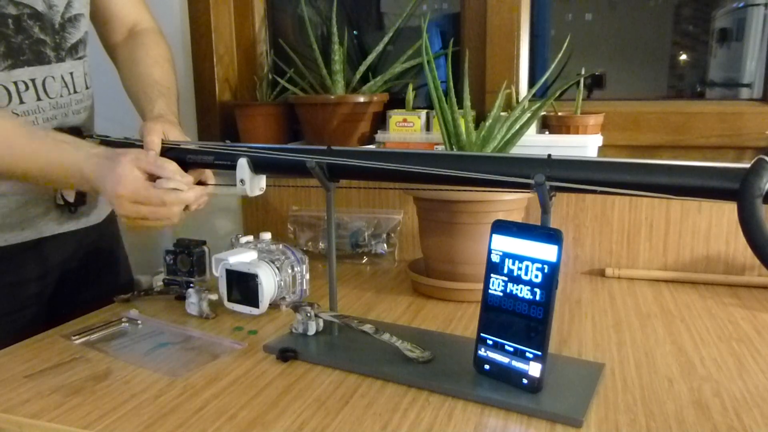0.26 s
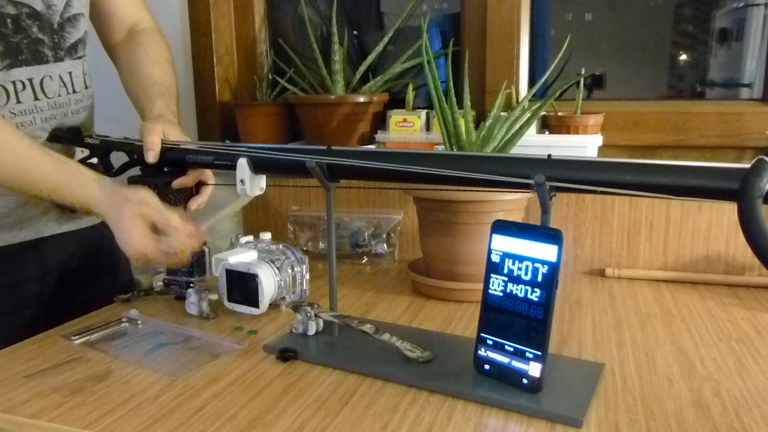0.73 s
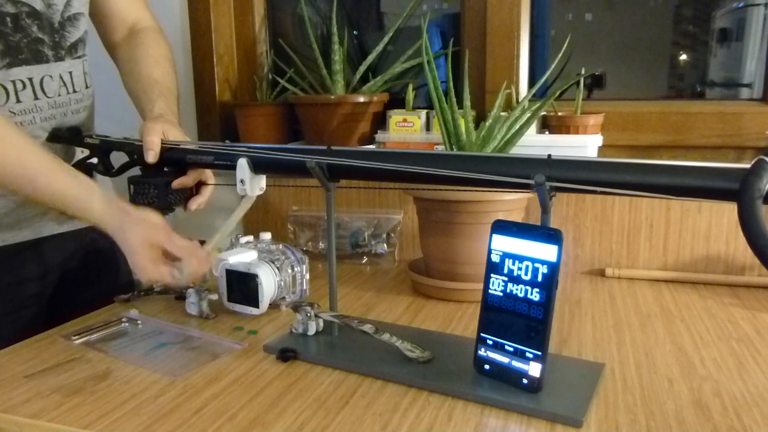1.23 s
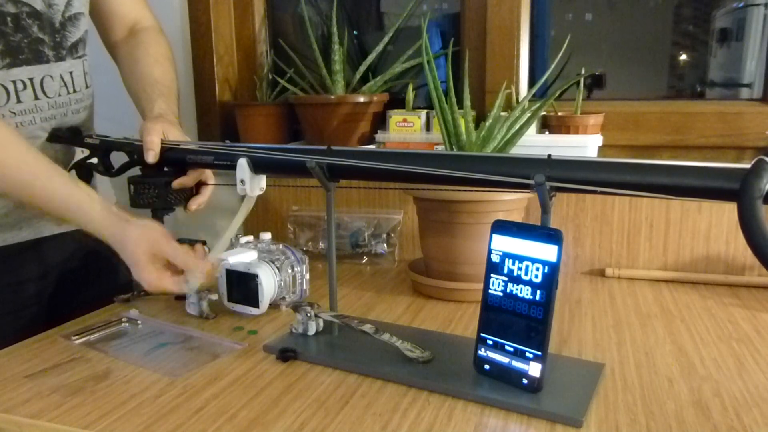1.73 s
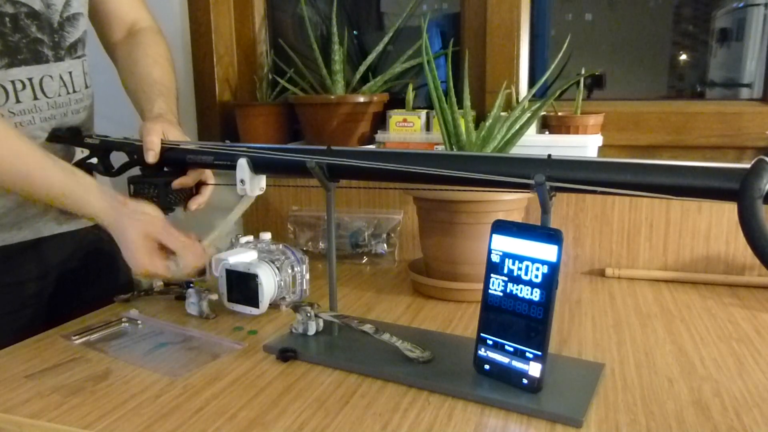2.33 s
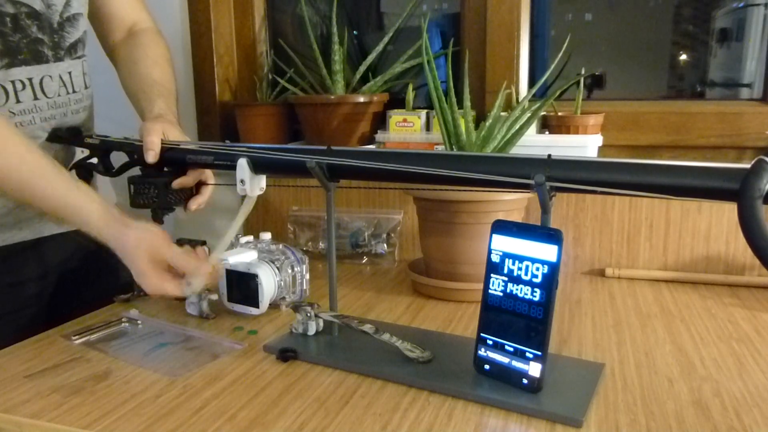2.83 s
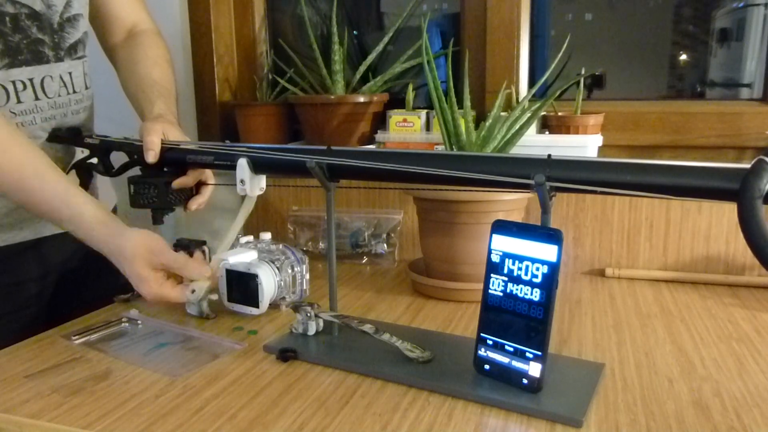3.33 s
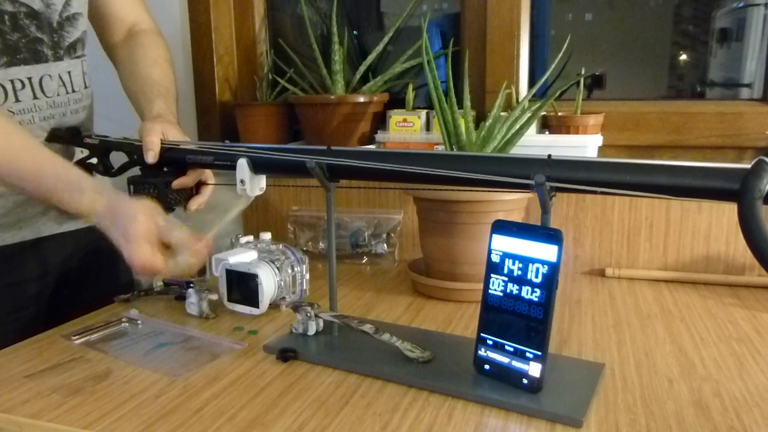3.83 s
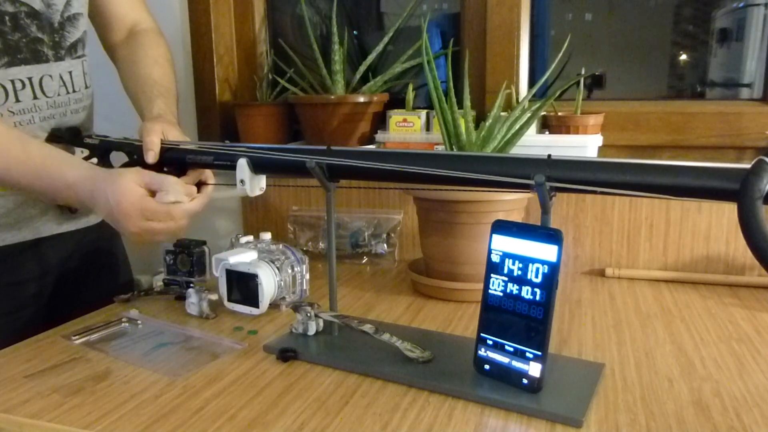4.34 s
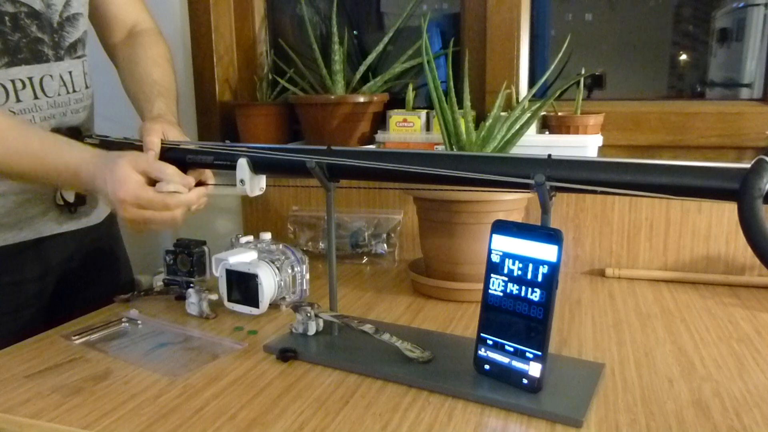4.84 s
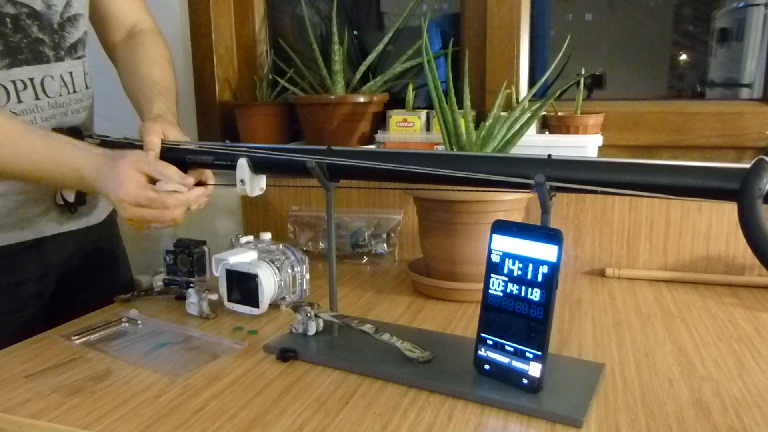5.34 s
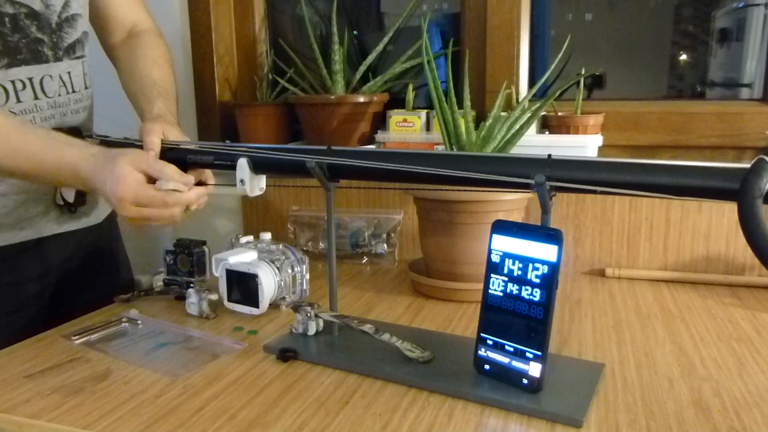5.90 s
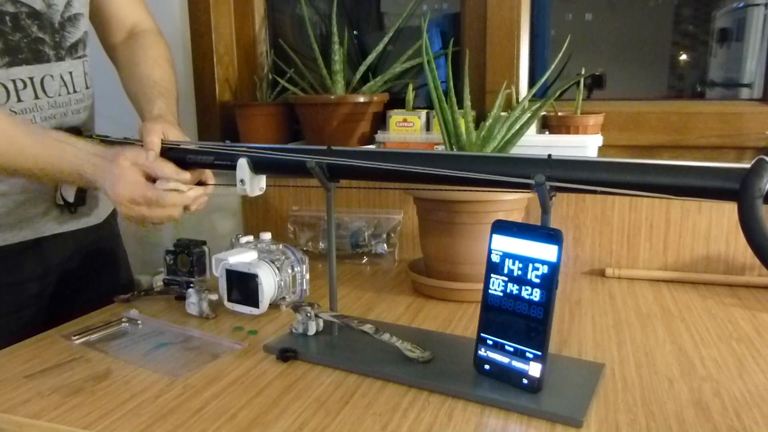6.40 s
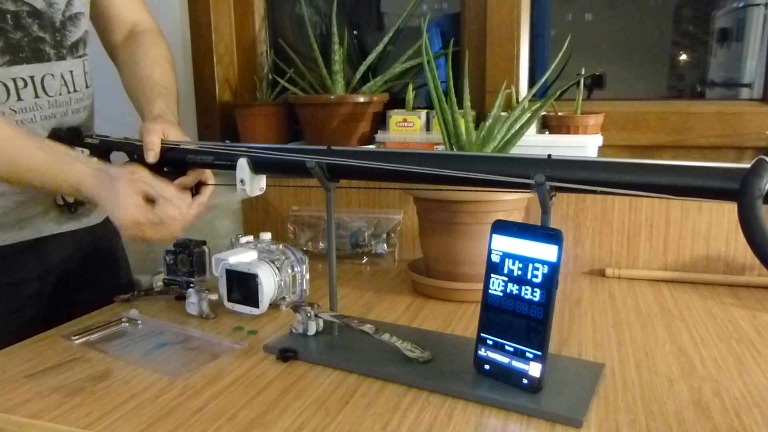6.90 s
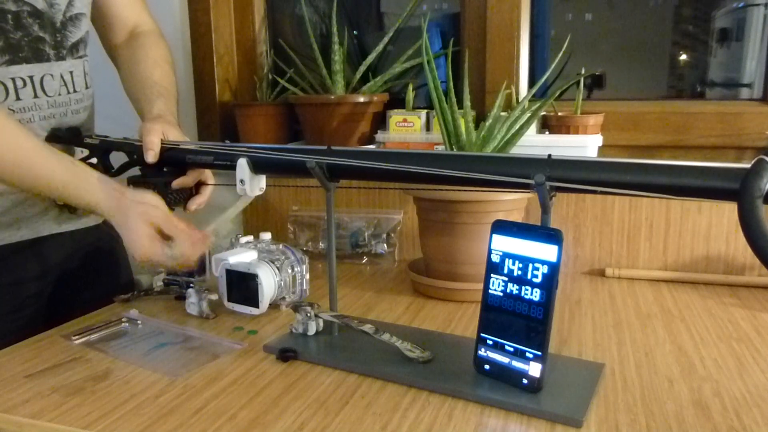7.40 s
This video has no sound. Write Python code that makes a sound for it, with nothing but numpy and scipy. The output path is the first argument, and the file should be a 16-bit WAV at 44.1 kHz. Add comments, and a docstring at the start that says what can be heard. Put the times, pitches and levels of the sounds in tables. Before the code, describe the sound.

Steady mechanical click-clacks, slightly left of centre, in a small, lively room with a short tail. A catch ticks, a spring lock sometimes cracks, and the jaw hits its stop. The first few strokes are milder, then loud snaps come in runs, overloading the microphone with tiny low thumps. Loose linkage taps and faint spring tings fill the gaps; one thin squeak comes near the end. Soft hiss lies underneath.

```python
"""A locking clamp of plastic and metal is worked by a hand lever, about twice a second, over a table in a small room.
Each stroke starts with the bright tick of the catch, on some the spring lock snaps, then the jaw clacks on its stop.
These blows are short bursts of noise plus fading sine waves; the returning arm then bumps the frame softly.
The handle knocks, the linkage taps, the slack spring rings and the pivot squeaks once, over room tone and hiss.
The sharp snaps overload the microphone, which adds a low thump of fading noise."""
import sys
import numpy as np
from scipy import signal
from scipy.fft import rfft, irfft
from scipy.io import wavfile
from scipy.ndimage import uniform_filter1d, minimum_filter1d

SR = 44100
rng = np.random.default_rng(int(sys.argv[2]) if len(sys.argv) > 2 else 0)


def wav_out(sig):
    """Save sig, one row per channel (or a flat mono array), as 16-bit PCM at SR to the path in sys.argv[1]."""
    wavfile.write(sys.argv[1], SR, np.round(np.clip(np.atleast_2d(sig).T, -1, 1) * 32767).astype(np.int16))


N = 337806

# ticks of the catch, one per stroke: start [s], how openly the tick faces the microphone [dB]
TICK_TIMES = [(0.1121, -2), (0.635, -3.5), (1.1955, -0.5), (1.736, 1), (2.2999, -6), (2.826, -0.5),
              (3.3792, -6), (3.9758, -0.5), (4.592, 1.5), (5.1359, 3.5), (5.7213, 3.5), (6.2427, -27),
              (6.7988, -3), (7.3362, -2.5)]
# snaps of the spring lock: start [s], strength [dB], pitch of the spring [Hz],
# level of the low thump as the microphone overloads [dB]
LOCK_SNAPS = [(0.7884, 3, 5660, -62), (1.0888, -10, 5900, -49), (1.8541, 15, 5286, -21),
              (2.4107, 13, 5580, -8), (2.941, 15.5, 5090, -29), (4.1019, 10, 5580, -8.5),
              (4.7133, 8, 5630, -17.5), (5.2562, 14, 5070, -24), (7.447, 14, 5485, -16)]
# clacks of the jaw on its stop: start [s], strength [dB], level of the arm's bump that follows [dB]
JAW_CLACKS = [(0.2581, -0.5, -47), (0.827, 0.5, -55.5), (1.3809, 0.5, -47.5), (1.9056, 6.5, -56),
              (2.4612, 3.5, -53), (3.0108, 2.5, -54.5), (3.5769, 4.5, -51), (4.1527, 4.5, -56),
              (4.7622, 4, -49.5), (5.3147, 6.5, -58), (5.8741, -0.5, -48.5), (6.4254, 1, -42),
              (6.9495, -4.5, -47.5), (7.5044, 6, -54.5)]
# what the clamp's body and catch ring with: pitch [Hz], level [dB], time to fade by 60 dB [s]
BODY_MODES = [(1970, -49.5, 0.069), (2183, -45.5, 0.041), (4800, -44.5, 0.042), (4980, -41, 0.085),
              (9670, -40, 0.084), (12100, -33.5, 0.076), (12050, -37.5, 0.13), (13000, -34.5, 0.08)]


def catch():
    """The small catch slides off its edge, drops in with a bright tick and chatters a few times."""
    # colour of a tick: frequency [Hz], level [dB per Hz]
    tick_colour = [(150, -27), (500, -32), (730, -19.5), (1350, -26.5), (2150, -15), (3000, -19.5),
                   (4300, -10.5), (5200, -4), (6800, -12), (8500, -14), (9600, -6.5), (11200, -7),
                   (12600, 4.5), (16000, -13)]
    tick_db, slide_db, chatter_db = 1.0, -4, -8.5
    slide_s = .004
    sound, direct = np.zeros(N), np.zeros(N)
    for start_s, open_db in TICK_TIMES:
        # the catch is spring-loaded, so it drops equally hard every time
        ring = from_db(-1.0) * ringing(BODY_MODES)
        tick = from_db(tick_db) * (contact(tick_colour, grit_t60=0.0034) + ring)
        add(sound, start_s, tick)
        add(direct, start_s, from_db(open_db) * tick)
        add(direct, start_s - slide_s, from_db(slide_db) * slide(tick_colour, slide_s))
        for delay_s in rng.uniform(.006, .018, size=4):
            add(direct, start_s + delay_s, from_db(chatter_db) * contact(tick_colour, grit_t60=0.0041))
    # mostly the treble beams forward; the room gets the full tick
    treble = signal.butter(1, 3500, "high", fs=SR, output="sos")
    beamed = signal.sosfilt(treble, direct)
    return left_and_right(beamed) + room(sound, wet_db=0.5, swell_s=0.0046)


def lock():
    """The spring goes over centre: a crack at its edge, a short, strong ping and a jolt of the housing."""
    # colour of the crack: frequency [Hz], level [dB per Hz]
    crack_colour = [(150, -26.5), (1400, -31.5), (2700, -15), (4000, -3), (7000, -15.5), (8800, -10.5),
                    (10500, 5), (12600, 12.5), (13700, 6.5), (16000, -13.5)]
    # colour of the plastic around the spring, shaken by each snap: frequency [Hz], level [dB per Hz]
    housing_colour = [(300, -19), (1500, -21.5), (2200, -7), (2700, -2), (3900, -1.5), (4600, -1.5),
                      (7000, -4), (12000, 1), (16000, -20.5)]
    # the nearer its edge the spring lets go, the higher it rings and the more it cracks,
    # with the full crack from edge_hz up
    edge_hz, full_crack_db, crack_db_per_hz = 5689, 5, .062
    slide_s = .003
    out = np.zeros(N)
    for start_s, strength_db, pitch_hz, thump_db in LOCK_SNAPS:
        crack_db = full_crack_db - crack_db_per_hz * max(edge_hz - pitch_hz, 0)
        crack = from_db(crack_db) * contact(crack_colour, grit_t60=0.0077)
        jolt = from_db(-12.5) * contact(housing_colour, grit_t60=0.0031)
        add(out, start_s - slide_s, from_db(strength_db - 20.5) * slide(crack_colour, slide_s))
        add(out, start_s, from_db(strength_db) * (ping(pitch_hz) + crack + jolt))
    return left_and_right(out) + room(out, wet_db=-4, swell_s=0.0047)


def ping(pitch_hz):
    """The spring takes a few cycles to swing up and is soon damped; energy one."""
    # the spring's modes: multiple of its pitch [ratio], level [dB], time to fade by 60 dB [s]
    spring_modes = [(0.54, -25.5, 0.0086), (.73, -14, 0.0089), (0.919, -2.5, 0.011), (1.0, 16, 0.0064),
                    (1.05, -3, 0.009)]
    swing_up_s = .0035
    spring = ringing([(ratio * pitch_hz, level_db, t60) for ratio, level_db, t60 in spring_modes])
    return unit_energy(spring * (1 - dying(seconds(), swing_up_s)))


def jaw():
    """The jaw hits its stop: one full blow when thrown, a graze and then a blow when eased shut."""
    # a jaw thrown by the spring lands flat and sounds the plastic body;
    # one eased shut grazes first and sounds the hard edge
    thrown = body_colour(body_db=12, edge_db=-0.5)
    eased = body_colour(body_db=3.0, edge_db=5.0)
    throw_within_s, throw_above_db = .1, 6
    graze_lead_s, graze_db = .005, -6   # level relative to the clack
    out = np.zeros(N)
    for start_s, strength_db, bump_db in JAW_CLACKS:
        is_thrown = any(0 < start_s - snap_s < throw_within_s and snap_db > throw_above_db
                        for snap_s, snap_db, pitch_hz, thump_db in LOCK_SNAPS)
        if is_thrown:
            add(out, start_s, from_db(strength_db) * clack(thrown))
        else:
            add(out, start_s - graze_lead_s, from_db(strength_db + graze_db) * clack(eased))
            add(out, start_s, from_db(strength_db) * clack(eased))
    return left_and_right(out) + room(out, wet_db=2.0, swell_s=0.0045)


def clack(colour):
    """One blow of the jaw: a gritty contact and the ring of the clamp."""
    return contact(colour, grit_t60=0.012) + from_db(-7.0) * ringing(BODY_MODES)


def body_colour(body_db, edge_db):
    """The clack's spectrum, with the plastic body below and the hard edge above raised or lowered."""
    # colour of a clack: frequency [Hz], level [dB per Hz]
    clack_colour = [(150, -33.5), (400, -27.5), (700, -20), (1300, -22), (2000, -11), (2800, -9.5),
                    (4000, -4), (5400, -1.5), (6600, -1.5), (8800, 2), (10300, 6), (12200, -2.5),
                    (14700, -3), (16000, -2)]
    body_hz, edge_hz = 3500, 11800
    hz, level_db = np.transpose(clack_colour)
    body = body_db / (1 + (hz / body_hz) ** 2)
    edge = edge_db / (1 + (edge_hz / hz) ** 20)
    return list(zip(hz, level_db + body + edge))


def handle():
    """The hollow handle gives a short, woody knock just after the catch drops and as the jaw lands."""
    # the hollow handle's modes: pitch [Hz], level [dB], time to fade by 60 dB [s]
    handle_modes = [(466, -9, .05), (735, -4, .05), (751.5, -1, .07)]
    lag_s, with_tick_db, with_clack_db = 0.012, -48.5, -54.5   # the last is relative to the clack
    blows = [(start_s + lag_s, with_tick_db) for start_s, open_db in TICK_TIMES]
    blows += [(start_s, strength_db + with_clack_db) for start_s, strength_db, bump_db in JAW_CLACKS]
    out, swell = np.zeros(N), 1 - dying(seconds(), 0.043)
    for start_s, level_db in blows:
        add(out, start_s, from_db(level_db) * ringing(handle_modes) * swell)
    return left_and_right(out) + room(out, wet_db=-4.0, swell_s=0.004)


def linkage():
    """The loose linkage taps, also as the lever takes up its play; now and then the slack spring rings."""
    # taps: start [s], strength [dB], weight of the body [dB], hard edge [dB]
    loose_taps = [(0.5103, -29.5, -11, -6), (0.602, -10, 4, 7), (1.0876, -1, -37, -18),
                  (1.6995, -8.5, -0.5, 3), (2.9891, 0, 8.5, -10), (3.935, -8.5, 5.5, 3.5),
                  (5.1075, -22.5, 2, -0.5), (5.959, -22, 15, 0), (6.678, -24, -6, -2)]
    # the slack spring rings by itself: start [s], strength [dB]
    spring_tings = [(1.3064, -24.5), (4.694, -22), (4.8995, -26.5), (6.343, -30)]
    slack_hz = 5080
    # shortly before each tick the lever faintly takes up its play
    play_lead_s, play_db, play_spread_db = .118, -37.0, 2.5
    play = [(start_s - play_lead_s, play_db + play_spread_db * rng.standard_normal(), 0, 0)
            for start_s, open_db in TICK_TIMES]
    out = np.zeros(N)
    for start_s, strength_db, body_db, edge_db in loose_taps + play:
        tap = contact(body_colour(body_db, edge_db), grit_t60=0.0081)
        add(out, start_s, from_db(strength_db) * tap)
    for start_s, strength_db in spring_tings:
        add(out, start_s, from_db(strength_db) * ping(slack_hz))
    return left_and_right(out) + room(out, wet_db=3, swell_s=0.00066)


def pivot():
    """The dry pivot squeaks once: a thin, wavering note that rises faster and faster."""
    start_s, length_s, level_db = 6.82, .16, -61.5
    first_hz, last_hz, waver_hz = 1160, 1227, 18
    along = np.minimum(seconds(size=12000) / length_s, 1)   # 0 at the start, 1 at the end
    waver = uniform_filter1d(rng.standard_normal(len(along)), size=300)
    hz = first_hz + (last_hz - first_hz) * along ** 2 + waver_hz * waver / waver.std()
    note = np.sin(2 * np.pi * np.cumsum(hz) / SR)
    out = np.zeros(N)
    add(out, start_s, from_db(level_db) * np.sin(np.pi * along) * note)
    return left_and_right(out) + room(out, wet_db=0.5, swell_s=0.0045)


def frame():
    """After each clack the arm's soft, padded bump swells for a moment and sets the frame humming."""
    # the frame's dull modes: pitch [Hz], level [dB], time to fade by 60 dB [s]
    frame_modes = [(140.9, 14, 0.092), (131, -8, 0.35), (159.8, 0, 0.33), (346, -9, 0.21),
                   (484, -21.5, 0.13), (710, -17.5, 0.17)]
    # dull noise: frequency [Hz], level [dB per Hz]
    flutter_colour = [(40, -31.0), (100, -1.0), (150, 6.5), (220, -4), (600, -12), (2000, -41.0)]
    bump_delay_s = .091   # the arm reaches the end of its swing this long after the clack
    out, t = np.zeros(N), seconds()
    swell = (1 - dying(t, 0.093)) ** 2
    for start_s, strength_db, bump_db in JAW_CLACKS:
        flutter = coloured(rng.standard_normal(len(t)), flutter_colour)
        hum = ringing(frame_modes) + from_db(21.5) * flutter * dying(t, 0.14)
        add(out, start_s + bump_delay_s, from_db(bump_db) * hum * swell)
    return out + room(out, wet_db=-10, swell_s=0.039)


def microphone_overload():
    """The sharp snaps overload the microphone: a dry, low thump, uneven left and right, from faint to strong."""
    # colour of the thump: frequency [Hz], level [dB per Hz]
    thump_colour = [(30, -23.5), (150, -1.5), (400, 6.5), (1300, 6), (2500, -2.5), (6000, -18)]
    out, t = np.zeros((2, N)), seconds()
    for start_s, strength_db, pitch_hz, thump_db in LOCK_SNAPS:
        noise, hz = diffuse(len(t))
        bursts = irfft(noise) * dying(t, 0.0048)
        for side, burst in zip(out, bursts):
            add(side, start_s + 0.00071, from_db(thump_db) * unit_energy(coloured(burst, thump_colour)))
    return out


def room(x, wet_db, swell_s):
    """A few early echoes and a diffuse tail that swells, then fades at its own pace in each pitch range."""
    # early echoes from table, wall and window: delay [s], level [dB]
    early_echoes = [(.0013, -21.5), (.0042, -17.5), (.0065, -17), (.0079, -20), (0.0125, -19.5),
                    (0.0194, -22.5)]
    # the room's decay: frequency [Hz], time to fade by 60 dB [s]
    room_decay = [(150, 0.21), (400, 0.61), (1060, 0.38), (2800, 0.33), (5500, 0.34), (10000, 0.29),
                  (15000, 0.23)]
    t = seconds(size=24000)
    noise, hz = diffuse(len(t))
    centres = [centre_hz for centre_hz, t60 in room_decay]
    tail = 0
    for share, (centre_hz, t60) in zip(np.eye(len(centres)), room_decay):
        band = irfft(noise * at_hz(list(zip(centres, share)), hz))
        tail = tail + band * dying(t, t60)
    early = 1 + 1.5 * dying(t, 0.04)   # the near walls return more than the late tail
    swell = 1 - np.exp(-(t / swell_s) ** 2)
    response = from_db(wet_db) * unit_energy(tail * early * swell)
    for delay_s, level_db in early_echoes:
        for side in response:   # each echo reaches left and right at slightly different moments
            shift_samples = rng.normal(0, .13)
            side += from_db(level_db) * np.sinc((t - delay_s) * SR - shift_samples)
    return signal.fftconvolve(x[None], response, axes=-1)[:, :N]


def room_tone():
    """Steady quiet air and microphone hiss: filtered noise, widest in the middle of its range."""
    # colour of the air and hiss: frequency [Hz], level [dB per Hz]
    floor_colour = [(25, 0.5), (60, -6.5), (140, 1), (300, 0.5), (700, -4), (1500, -8), (3300, -14.5),
                    (4900, -10), (6500, -11.5), (10000, -15), (16000, -19)]
    # its width: frequency [Hz], level of the left-right difference against the middle [dB]
    floor_width = [(60, -6), (130, -5), (290, -4.5), (640, 1.5), (1410, 5.5), (3100, -1), (6820, -5.5),
                   (15000, -7.5)]
    floor_db = -64.5
    hz = np.fft.rfftfreq(N, 1 / SR)
    mid, side = rfft(rng.standard_normal((2, N))) * from_db(at_hz(floor_colour, hz))
    mid = irfft(mid, N)
    side = irfft(side * from_db(at_hz(floor_width, hz)), N)
    return from_db(floor_db) * (mid + side * [[1], [-1]]) / mid.std()


def contact(colour, grit_t60):
    """A hard blow: rough faces meet in a fading burst of grit, even in spectrum until coloured; energy one."""
    envelope = dying(seconds(), grit_t60)
    grit = rfft(rng.standard_normal(len(envelope)) * envelope)
    even = irfft(grit / (abs(grit) + 1e-12))   # every frequency equally strong
    return unit_energy(coloured(even * np.sqrt(envelope), colour))


def slide(colour, length_s):
    """Faces rub ever harder just before they let go: noise that grows, then stops; energy one."""
    t = seconds()
    rub = rng.standard_normal(len(t)) * t * (t < length_s)
    return unit_energy(coloured(rub, colour))


def ringing(modes):
    """Struck modes: fading sine waves, each with a strength of its own on every blow."""
    t, out = seconds(), 0
    for pitch_hz, level_db, t60 in modes:
        chance_db = rng.uniform(-3, 3)
        out = out + from_db(level_db + chance_db) * np.sin(2 * np.pi * pitch_hz * t) * dying(t, t60)
    return out


def left_and_right(x):
    """Direct sound: the clamp is a little to the left, so that side is slightly louder and earlier."""
    left_db, lead_samples = 1.1, .3
    half = np.array([[.5], [-.5]])
    return from_db(left_db * half) * (x + lead_samples * half * np.gradient(x))   # slope shifts the time


def diffuse(size):
    """Spectra of left and right white noise, partly alike; and their frequencies."""
    # how alike left and right are in diffuse sound: frequency [Hz], likeness [0-1]
    likeness = [(30, .55), (130, .94), (300, .55), (600, .38), (1200, .58), (2500, .9), (6000, .82),
                (15000, .8)]
    hz = np.fft.rfftfreq(size, 1 / SR)
    alike = np.clip(at_hz(likeness, hz), 0, 1)
    mid, side = rfft(rng.standard_normal((2, size)))
    return np.sqrt(1 + alike) * mid + np.sqrt(1 - alike) * side * [[1], [-1]], hz


def coloured(x, colour):
    """Filter to the given spectrum with no sound ahead of the blow (causal, minimum-phase)."""
    size = len(x)
    cepstrum = irfft(np.log(from_db(at_hz(colour, np.fft.rfftfreq(size, 1 / SR)))))
    # fold the backward half of the log-spectrum's transform onto the forward half
    cepstrum[1:size // 2] *= 2
    cepstrum[size // 2 + 1:] = 0
    return irfft(rfft(x) * np.exp(rfft(cepstrum)))


def from_db(db):
    """Decibels to gain."""
    return 10 ** (np.asarray(db) / 20)


def at_hz(points, hz):
    """Read a table along a log-frequency axis."""
    known_hz, values = np.transpose(points)
    return np.interp(np.log(np.maximum(hz, 1)), np.log(known_hz), values)


def unit_energy(x):
    """Scale each channel to an energy of one."""
    return x / np.sqrt(np.sum(x ** 2, axis=-1, keepdims=True) + 1e-20)


def seconds(size=8192):
    """Time axis of one blow."""
    return np.arange(size) / SR


def dying(t, t60):
    """A decay of 60 dB in t60 seconds."""
    return np.exp(-np.log(1000) * t / t60)


def add(track, start_s, sound):
    """Mix a sound into a track at start_s seconds."""
    start = max(round(start_s * SR), 0)
    track[start:start + len(sound)] += sound[:max(N - start, 0)]


def scene():
    """The clamp, the microphone's overload thumps and the quiet of the room."""
    clamp = catch() + lock() + jaw() + handle() + linkage() + pivot() + frame()
    return clamp + microphone_overload() + room_tone()


def record(dry):
    """The top is cut, and a very fast limiter turns down peaks above full scale."""
    low_pass = signal.ellip(10, .2, 95, 15800, fs=SR, output="sos")
    band = signal.sosfilt(low_pass, dry)
    allowed = 1 / np.maximum(abs(band).max(axis=0), 1)
    gain = uniform_filter1d(minimum_filter1d(allowed, size=45), size=45)   # 45 samples, about 1 ms
    last_low_pass = signal.cheby2(12, 70, 17500, fs=SR, output="sos")
    return signal.sosfilt(last_low_pass, band * gain)


dry = scene()
out = record(dry)
wav_out(out)
```